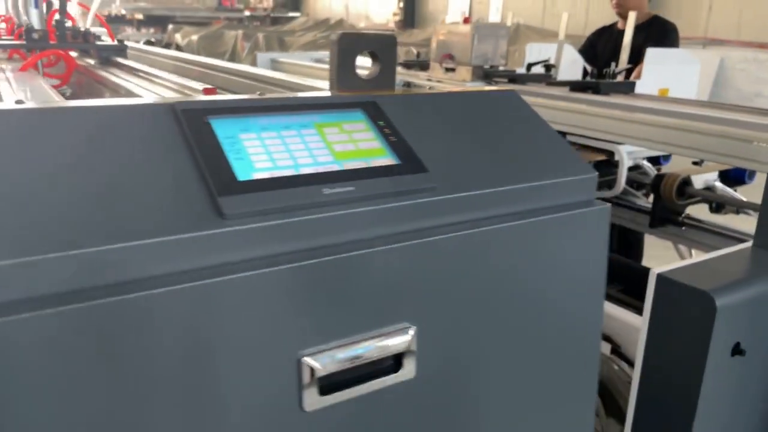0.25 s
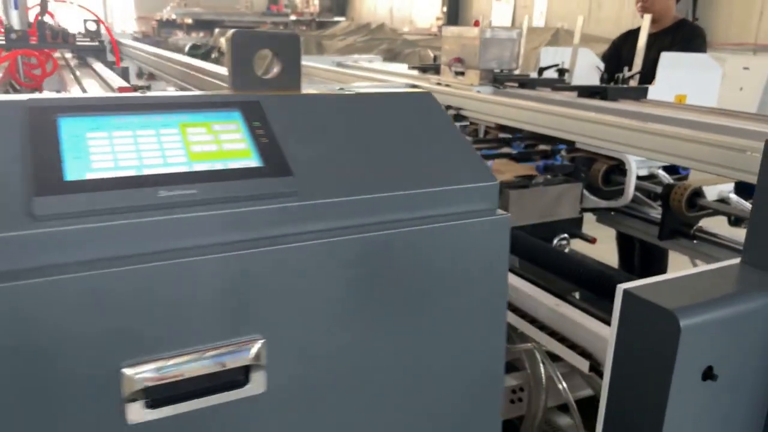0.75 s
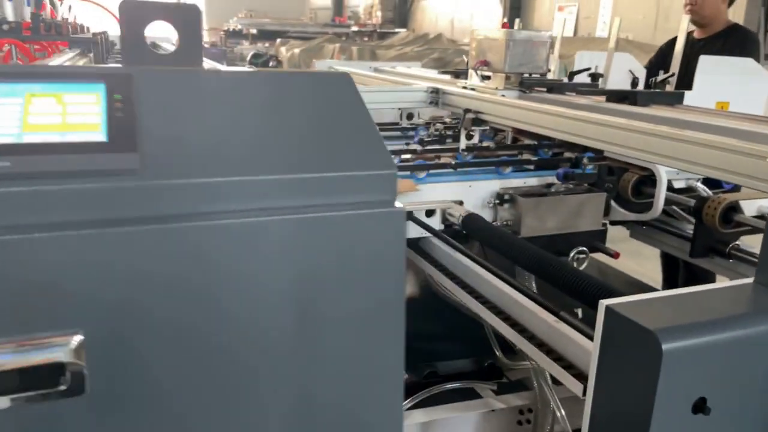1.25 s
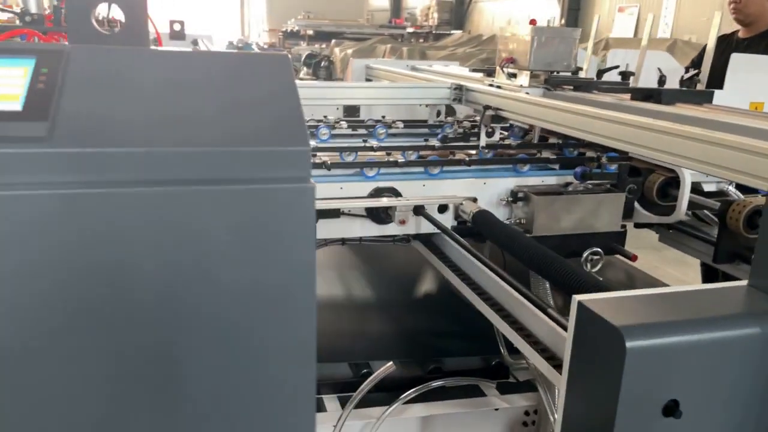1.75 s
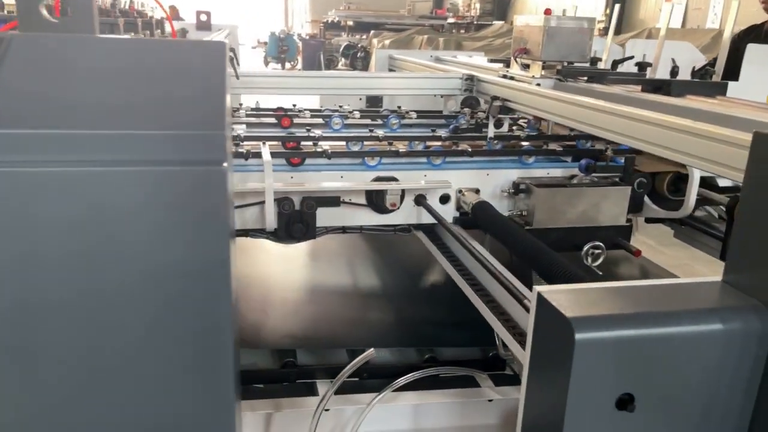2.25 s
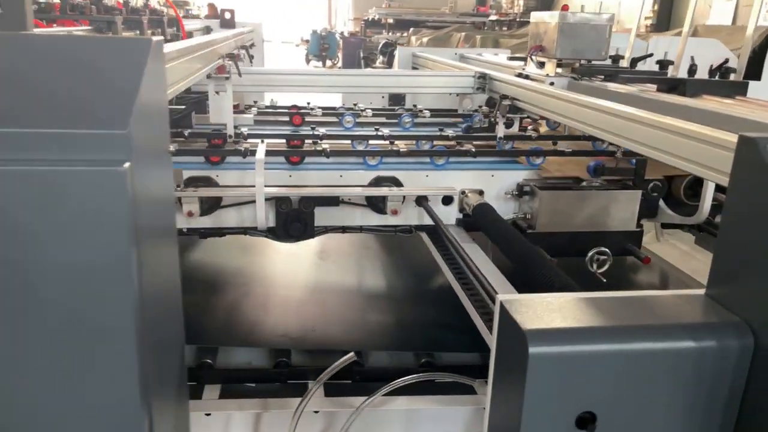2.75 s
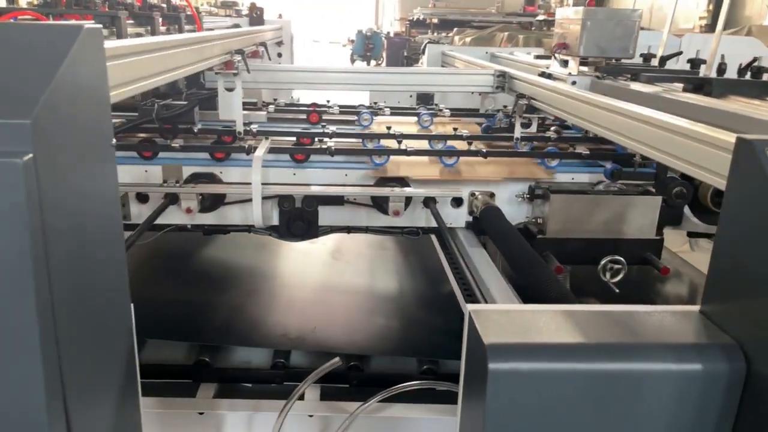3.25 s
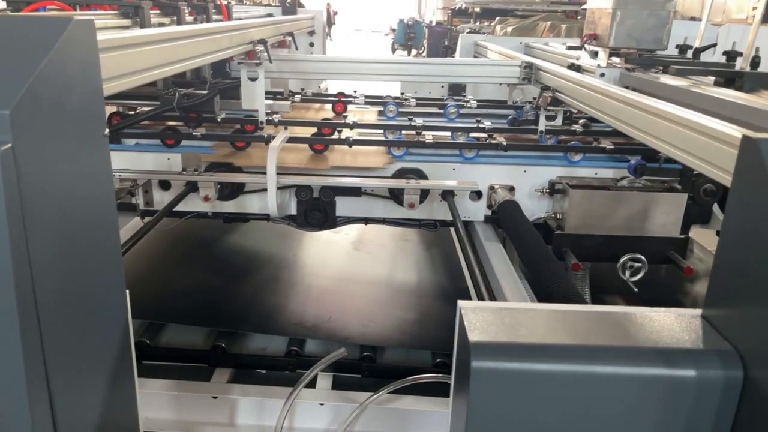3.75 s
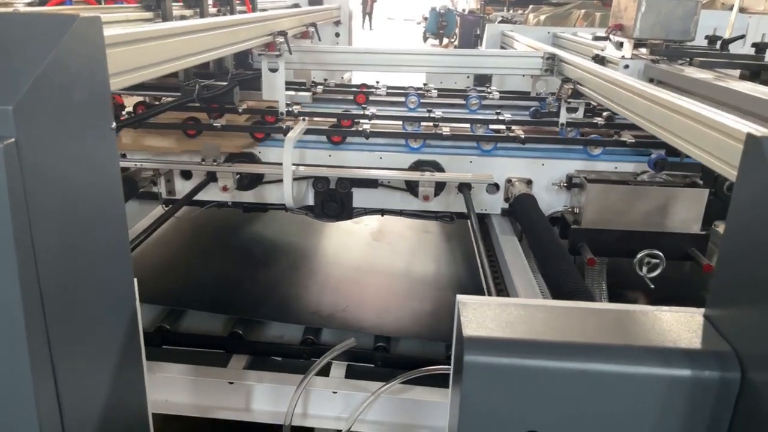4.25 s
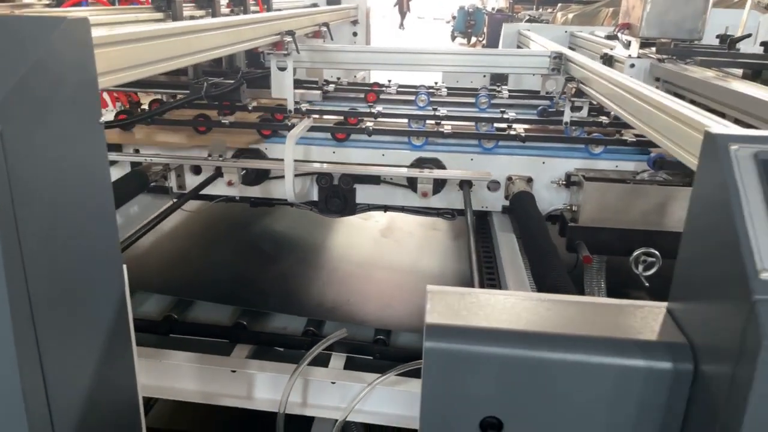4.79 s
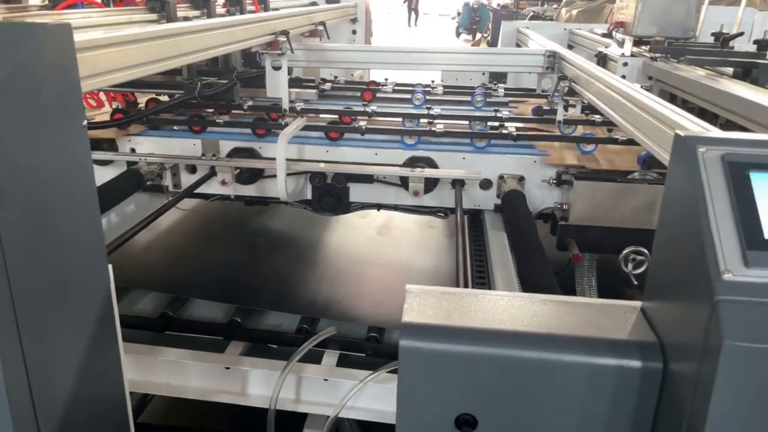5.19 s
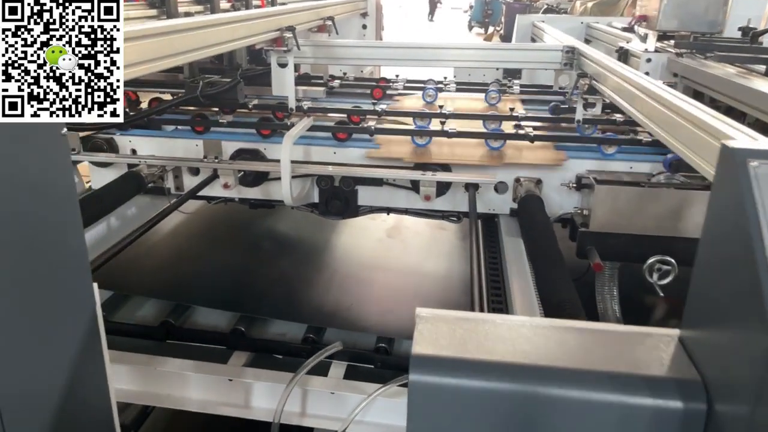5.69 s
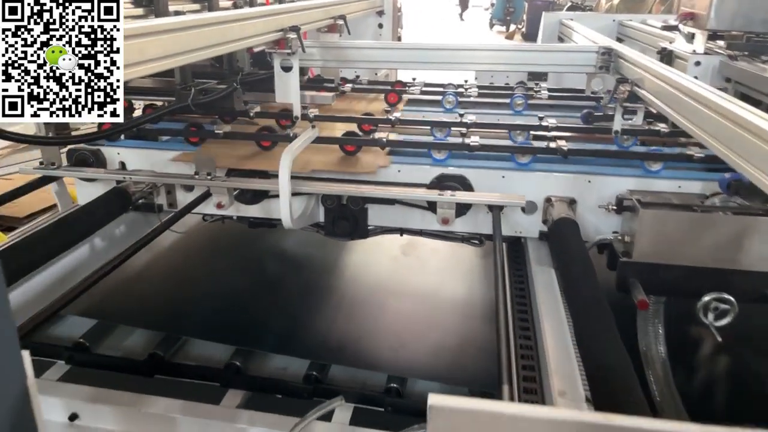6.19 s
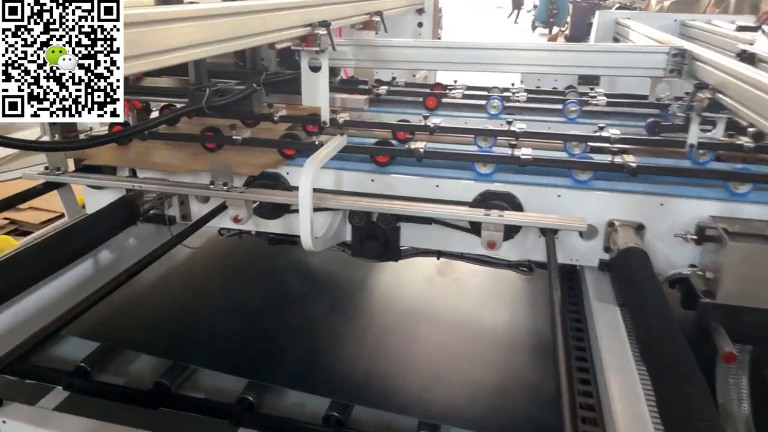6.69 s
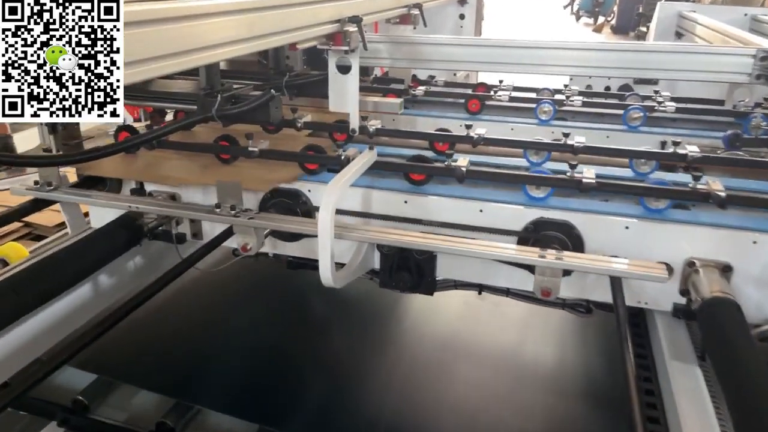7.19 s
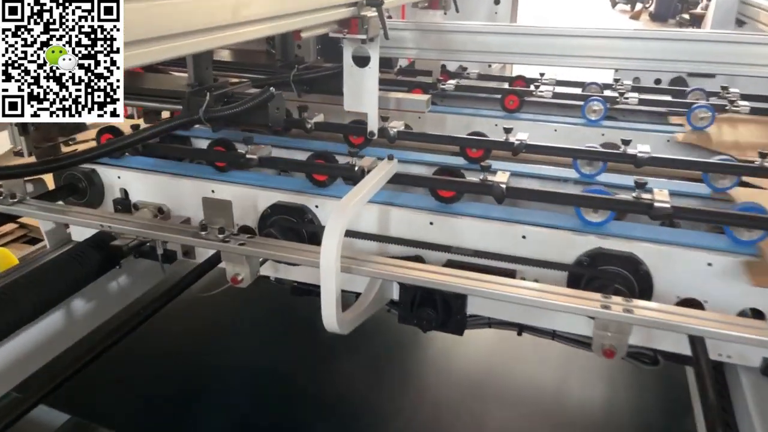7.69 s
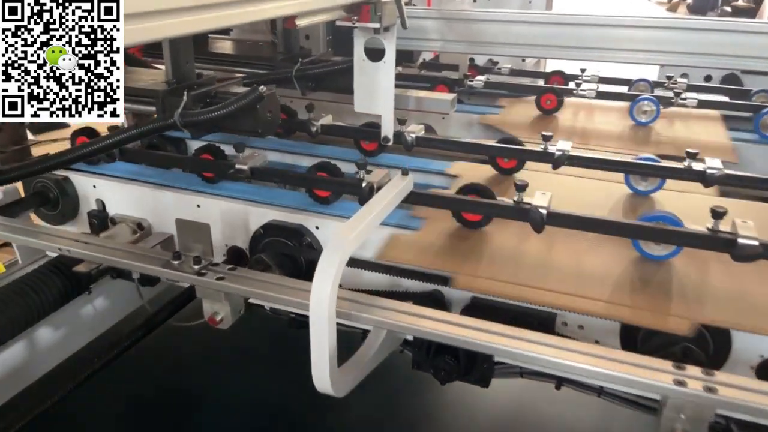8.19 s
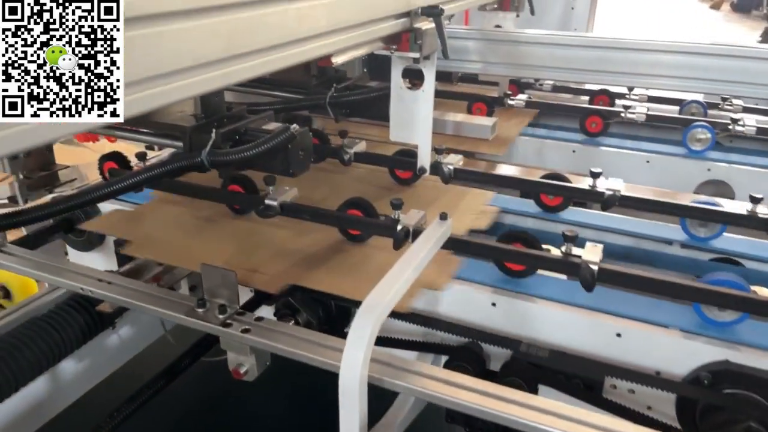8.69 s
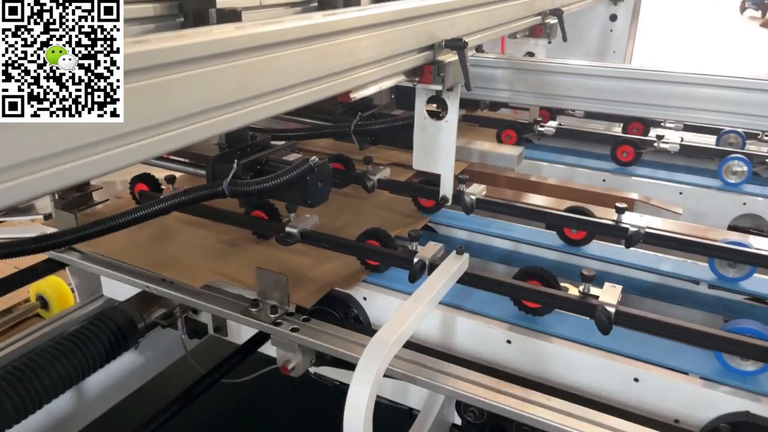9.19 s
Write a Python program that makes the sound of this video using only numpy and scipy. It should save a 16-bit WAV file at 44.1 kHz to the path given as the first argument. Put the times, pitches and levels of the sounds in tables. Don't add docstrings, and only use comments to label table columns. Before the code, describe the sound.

Low steady motor hum and roaring belts in a factory, cut by deep cardboard thumps, sharp knocks, dry scrapes and puffs of compressed air.

```python
import sys
import numpy as np
from scipy import signal
from scipy.fft import rfft, irfft, next_fast_len
from scipy.io import wavfile
from scipy.ndimage import uniform_filter1d

SR = 44100
rng = np.random.default_rng(int(sys.argv[2]) if len(sys.argv) > 2 else 0)


def boost(x):
    u = np.asarray(x, float) / 20
    return 10 ** u


def store_pcm(level_fs):
    pcm = np.round(np.clip(level_fs, -1, 1) * 32767).astype(np.int16)
    wavfile.write(sys.argv[1], SR, np.atleast_2d(pcm).T)


N = 416296
SIZE = next_fast_len(N)
TIME = np.arange(N) / SR
OCTAVE = np.log2(np.maximum(np.arange(SIZE // 2 + 1) * SR / SIZE, 1))


def unit(x):
    return x / np.sqrt(np.mean(x ** 2))


def noise():
    return rng.standard_normal(N)


def sine(hz, t):
    return np.sin(2 * np.pi * hz * t)


def columns(table):
    s, *rest = np.transpose(table)
    return [np.interp(TIME, s, column) for column in rest]


def gain_curve(points):
    hz, db = np.transpose(points)
    return boost(np.interp(OCTAVE, np.log2(hz), db))


def colour(x, points):
    return irfft(rfft(x, SIZE) * gain_curve(points), SIZE)[:N]


def ring(x, hz, width_hz):
    return signal.lfilter(*signal.iirpeak(hz, hz / max(width_hz, 1), fs=SR), x)


def walk(rate):
    hold = int(SR / rate)
    steps = np.repeat(rng.standard_normal(N // hold + 1), hold)
    return unit(uniform_filter1d(uniform_filter1d(steps, hold), hold)[:N])


def split(x, hz):
    low = signal.butter(4, hz, fs=SR, output="sos")
    high = signal.butter(4, hz, "high", fs=SR, output="sos")
    return signal.sosfilt(low, x), signal.sosfilt(high, x)


def decay(t, t60, rise):
    return (1 - np.exp(-t / max(rise, 1e-4))) * np.exp(-np.log(1000) * t / max(t60, .005))


def strikes(rows, shape):
    out, t = np.zeros(N + SR // 2), np.arange(SR // 2) / SR
    for s, *row in rows:
        start = int(s * SR)
        out[start:start + len(t)] += shape(t, *row)
    return out[:N]


def strokes(rows, attack_s, sag_db_per_s, release_t60_s):
    body, tinted = np.zeros(N), np.zeros(N)
    for s, length, db, tint_db in rows:
        t = TIME - s
        rise = np.clip(t / max(attack_s, .002), 0, 1)
        sag_db = sag_db_per_s * np.clip(t, 0, length)
        release_db = 60 * np.maximum(t - length, 0) / release_t60_s
        shape = rise * boost(db - sag_db - release_db)
        body += shape
        tinted += boost(tint_db) * shape
    return body, tinted


def motor():
    # (time [s], hum [Hz], level [dB])
    drive = [(0.0, 175, -21), (0.1, 171.3, -26), (0.23, 170, -20), (0.26, 169.7, -27.5), (0.73, 172.1, -27),
             (2.08, 170.4, -25), (2.34, 170.3, -22), (3.65, 170.9, -28), (4.7, 171.3, -22.5),
             (5.6, 170.3, -28.5), (7.02, 170.4, -23.5), (8.49, 171.4, -25.5), (8.6, 171, -38),
             (8.68, 172, -24), (8.75, 170, -45), (8.81, 170.9, -21), (8.94, 170.7, -30), (9.44, 171.5, -23)]
    # (multiple of the shaft turn, level [dB])
    shaft = [(2, -45.5), (4, -53.5), (5, -66), (7, -40), (8, -40), (9, -42.5), (10, -44), (12, -44.5),
             (16, -41)]
    # (frequency [Hz], width [Hz], level [dB])
    frame = [(86, 10, -31.5), (180.7, 27, -34.5), (335.4, 5.8, -38.5), (365, 13, -39), (508, 23, -38.5),
             (1115.5, 19, -48), (2360, 20, -48), (2550, 330, -42.5), (2984, 26, -51), (3305, 110, -47.5)]
    hum_order = 6
    hum_hz, hum_db = columns(drive)
    turn = 2 * np.pi * np.cumsum(hum_hz / hum_order) / SR
    out = np.sqrt(2) * boost(hum_db + 1.2 * walk(9)) * np.sin(hum_order * turn)
    for order, db in shaft:
        out += np.sqrt(2) * boost(db + 2.2 * walk(2.5)) * np.sin(order * turn + .8 * walk(3))
    for hz, width_hz, db in frame:
        out += boost(db) * unit(ring(noise(), hz, width_hz))
    return out


def push(t, hz):
    push_s = .0042
    swell = (t / push_s * np.exp(1 - t / push_s)) ** 3
    ratios = np.array([[1], [.74], [1.45], [2.6]])
    modes = np.cos(2 * np.pi * hz * ratios * (t - push_s))
    return swell * (np.array([0.67, 0.31, 0.24, 0.11]) @ modes)


def thump(t, db, hz):
    bounce_s, bounce_db = .0072, -9
    bounce = boost(bounce_db) * push(np.maximum(t - bounce_s, 0), hz)
    body = 0.28 * decay(t, 0.18, 0.009) * (sine(235, t) + sine(325, t))
    return boost(db - 6.5) * (push(t, hz) + bounce + body)


def hook():
    # (time [s], peak [dB], board mode [Hz])
    blows_on_board = [
        (2.06, -14, 800),
        (2.271, -6, 396),
        (4.361, -13, 826),
        (4.592, -5.5, 414),
        (6.403, -15, 322),
        (6.699, -9, 345),
        (6.917, -2.5, 420),
        (8.826, -11, 345),
        (9.029, -11, 875),
        (9.243, 0.5, 400),
    ]
    return strikes(blows_on_board, thump)


def knock(t, db, hz):
    knock_t60_s, tick_t60_s = .075, .012
    ratios = np.array([[.66], [1], [1.14], [1.31], [1.55], [2.2]])
    modes = np.sin(2 * np.pi * hz * ratios * t + 2 * np.pi * rng.random((6, 1)))
    cluster = decay(t, knock_t60_s, 0.002) * (np.array([0.3, 0.55, .3, 0.4, .3, 0.2]) @ modes)
    crack_fall = decay(t, knock_t60_s, .0012) + .8 * decay(t, tick_t60_s, .0003)
    crack = ring(rng.standard_normal(len(t)), 1800, 2400) * crack_fall
    return boost(db + 3.5) * (cluster + crack)


def stops():
    # (time [s], peak [dB], main mode [Hz])
    slaps = [(0.098, -29, 935), (0.17, -25, 1090), (2.427, -25, 1960), (2.512, -24.5, 1700),
             (3.529, -22, 939), (2.272, -22, 1200), (4.59, -22.5, 1250), (9.245, -20, 1200),
             (5.826, -22.5, 900), (4.62, -23, 1090), (6.965, -19, 1100), (6.755, -22, 1650),
             (4.748, -22.5, 971), (4.829, -26, 1250), (5.814, -21, 1400), (7.074, -18, 1950),
             (7.155, -19.5, 1350), (8.098, -20, 1892), (8.824, -21.5, 902), (9.158, -19, 1902),
             (9.285, -22, 1500), (9.06, -18, 1500), (9.398, -12, 980)]
    return strikes(slaps, knock)


def scrapes():
    # (time [s], drag length [s], level [dB], brightness [dB])
    drags = [(-0.03, .2, -28, -15), (1.265, 0.054, -29, -5), (2.03, 0.15, -28.5, -1),
             (2.265, 0.14, -28, -2), (3.5, 0.094, -33.5, -4), (4.335, .2, -29.5, 1), (4.59, .13, -28.5, 0),
             (5.74, .05, -33, 0), (6.665, .17, -26, 2.5), (6.925, 0.081, -23.5, -3),
             (8.075, 0.085, -27, -3), (8.9, .05, -32, 2), (8.985, .15, -22.5, -0.5),
             (9.25, 0.082, -24.5, 2)]
    # (frequency [Hz], level [dB per Hz])
    board = [(200, -19), (400, -7), (800, -3), (1080, -1.5), (1220, -6.5), (1530, -1.5), (2300, -6.5),
             (3300, -5), (5600, -13.5), (9000, -36)]
    grain_size = np.repeat(rng.exponential(size=N // 64 + 1), 64)[:N]
    grains = noise() * boost(2.0 * grain_size)
    for hz in np.geomspace(420, 5200, num=22):
        slips = boost(3.5 * walk(55)) * noise()
        grains += .8 * ring(unit(slips), hz, hz / 14) * np.sqrt(SR / 2 / hz)
    rubbing = unit(colour(grains, board)) * boost(1.6 * walk(60) + 3.5)
    dull, bright = split(rubbing, 1900)
    drag, tinted = strokes(drags, .03, 62, 0.16)
    late = np.interp(TIME - 0.0075, TIME, tinted)
    return drag * dull + late * bright


def air(near_db):
    # (frequency [Hz], level [dB per Hz])
    jet = [(1500, -39), (3000, 6.5), (5000, 0), (7500, 2.5), (11000, -2.5), (16000, -1)]
    # (time [s], peak [dB], top end [dB])
    valves = [(0.398, -33, -18), (0.9303, -42, -29), (1.221, -29, -17), (2.1779, -33, -12),
              (2.2912, -33, -20), (2.7142, -34, -17), (3.479, -28, -16), (3.914, -38, -18),
              (4.2665, -37, -11), (4.4994, -37, 0), (4.6094, -35, -15), (4.8075, -37, -18),
              (5.7608, -28.5, -7), (6.1345, -38, -22), (6.594, -35, -16), (6.779, -25, -21),
              (6.8249, -26, -3), (6.9372, -29, -15), (7.0694, -44, -5), (7.3582, -27, -6),
              (7.9094, -38, -16), (8.0451, -20, -18), (8.4294, -34, -17), (8.9161, -30, -13),
              (9.1502, -28, 10), (9.2493, -27, -10)]
    # (time [s], open length [s], level [dB], top end [dB])
    nozzles = [(0.0, 0.13, -44, -6), (1.22, 0.084, -40, -8), (1.75, 0.37, -44, -11), (2.15, .35, -41.5, -9),
               (3.19, 0.36, -33.5, -13), (4.2, .15, -47, -4), (4.35, 0.45, -36, -10), (5.75, .08, -43, -12),
               (5.92, .25, -40, -11), (6.6, 0.15, -42, -9), (6.82, 0.051, -39, -4), (6.92, 0.23, -37.5, -4),
               (7.34, 0.064, -53, -4), (8.04, 0.05, -32.5, -6), (8.15, .25, -40.5, -6),
               (8.4, 0.39, -41.5, -5), (8.8, .18, -39, 2), (8.99, 0.095, -29, -11),
               (9.13, 0.088, -32.5, -7), (9.24, .25, -29.5, -4)]

    def puff(t, db, top_db):
        return boost(db) * decay(t, 0.15, .0025)

    def puff_edge(t, db, top_db):
        return puff(t, db + top_db, 0)

    mid, top = split(unit(colour(noise(), jet)), 11500)
    blow, blow_top = strokes(nozzles, 0.03, 10, 0.35)
    leak = boost(-47 + 0.55 * near_db + 1.3 * walk(2.46))
    body = (leak + blow) * boost(0.49 * walk(27)) + strikes(valves, puff)
    edge = boost(-5) * leak + blow_top + strikes(valves, puff_edge)
    return boost(-1.0) * body * mid + boost(3.0) * edge * top


def link(t, db):
    pair = sine(1808, t) + 0.58 * np.sin(2 * np.pi * 1865 * t + 2 * np.pi * rng.random())
    return boost(db - 1.0) * decay(t, 0.066, 0.0027) * pair


def rattles():
    # (time [s], chain rattle [dB], bearing squeak [dB])
    nearness = [(0.0, -42, -48), (0.35, -37.5, -49), (0.76, -43, -47), (1.8, -44, -48), (2.0, -37, -46),
                (2.5, -43, -43), (3.05, -40, -44), (3.4, -45, -42), (4.9, -46, -43), (5.3, -39.5, -42),
                (6.4, -41, -45), (7.2, -40, -40), (7.6, -34.5, -44), (8.3, -33, -42), (8.85, -34.5, -44),
                (9.05, -34, -42), (9.44, -36, -37)]
    # (time [s], peak [dB])
    near_links = [(7.5173, -30), (7.5509, -25), (7.6016, -19), (7.649, -22), (7.6914, -35), (7.7523, -33),
                  (7.7827, -24), (7.877, -19), (7.9119, -30), (7.9753, -32), (8.0546, -33), (8.0983, -25),
                  (8.1364, -26), (8.1746, -22), (8.2576, -14.5), (8.297, -19), (8.3514, -14.5),
                  (8.4257, -23), (8.4935, -26), (8.6106, -32), (8.6632, -27), (8.704, -25), (8.7939, -31),
                  (8.827, -34), (8.8831, -23), (8.927, -31)]
    chain_db, squeak_db = columns(nearness)
    beat = 2 * np.pi * np.cumsum(22.5 * (1 + 0.014 * walk(3.26))) / SR
    links = (1.3 + np.maximum(np.sin(beat), 0) ** 2) * noise()
    chain = unit(ring(links, 1809, 30)) + 1.3 * unit(ring(ring(links, 1830, 130), 1830, 130))
    guard = boost(0.85 * chain_db - 9.5) * unit(ring(links, 1600, 450))
    flutter = boost(1.2 * walk(40)) * noise()
    squeak = ring(ring(flutter, 4115, 150), 4115, 150)
    out = boost(chain_db - 4.5) * unit(chain) + guard + strikes(near_links, link)
    return out + boost(squeak_db - 0.6) * unit(squeak)


def inverter():
    # (time [s], carrier [dB], lower sideband [dB])
    whistle = [(0.0, -55, -55), (0.63, -52, -57), (1.71, -54, -57), (2.23, -47.5, -54), (3.05, -51, -54),
               (3.52, -47, -50), (3.73, -53, -51), (4.92, -49, -50), (5.23, -45.5, -50), (6.62, -51, -51),
               (6.7, -49, -49), (7.89, -50, -50), (8.04, -45, -48), (8.31, -51, -50), (8.54, -38, -41),
               (8.73, -48, -54), (9.02, -46, -48), (9.44, -49, -54)]
    carrier_hz, wide_hz, narrow_hz = 5000.5, 376.5, 317
    carrier_db, lower_db = columns(whistle)

    def fading():
        return 3 * walk(3)

    # (offset from the carrier [Hz], level [dB])
    lines = [(0, carrier_db + 1.5),
             (-wide_hz, lower_db + 2.0), (wide_hz, -57 + fading()),
             (-narrow_hz, -53 + fading()), (narrow_hz, -59 + fading())]
    lines += [(carrier_hz + hz, -67 + fading()) for hz in (-69, 0, 33)]
    out = np.zeros(N)
    for hz, db in lines:
        level = np.sqrt(2) * boost(db - 3 * np.abs(walk(5)) + 2)
        out += level * np.sin(2 * np.pi * (carrier_hz + hz) * TIME + .8 * walk(8))
    return out


def squeaks():
    # (time [s], peak [dB], frequency [Hz])
    pings = [
        (0.15, -36, 4420),
        (5.733, -26, 4430),
        (6.595, -27, 4450),
    ]
    # (time [s], length [s], level [dB], frequency [Hz])
    squeals = [
        (3.65, .6, -45.5, 2990),
        (4.158, .3, -39, 1397),
    ]

    def ping(t, db, hz):
        return boost(db) * decay(t, .09, .003) * sine(hz, t)

    out = strikes(pings, ping)
    for s, length, db, hz in squeals:
        held = strokes([(s, length, db, 0)], 0.027, 5.0, .1)[0]
        out += held * boost(2.47 * walk(30)) * np.sin(2 * np.pi * hz * TIME + 1.5 * walk(25))
    return out


def belts(near_db):
    # (frequency [Hz], level [dB per Hz])
    roar = [(20, -92), (33, -82), (48, -87), (65, -47), (130, -50), (260, -57), (520, -56.5), (850, -63),
            (1250, -69.5), (1700, -70), (2200, -70.5), (5300, -75.5), (6000, -80), (10000, -84),
            (16000, -94)]
    spectrum = rfft(rng.standard_normal(SIZE)) * np.sqrt(SR / 2) * gain_curve(roar)
    out, shared_db = np.zeros(N), .5 * walk(7)
    for centre in np.arange(4.5, 14.5, .5):
        window = np.cos(np.pi * np.clip(OCTAVE - centre, -.5, .5)) ** 2
        share = np.clip((centre - 6.0) / 4.5, 0, 1)
        swell = boost(share * (near_db + shared_db) + 0.67 * walk(11))
        out += swell * irfft(spectrum * window, SIZE)[:N]
    return out


def hall(short):
    t = TIME[:SR]
    tail = split(rng.standard_normal(SR) * decay(t, 1, 0.0067), 4900)[0]
    tail /= np.sqrt(np.sum(tail ** 2))
    return boost(-11.5) * signal.fftconvolve(short, tail)[:N]


def scene():
    # (time [s], level [dB])
    near = [(0, 1.5), (.5, -.7), (2.2, 1), (4.6, 1.5), (5.6, -0.5), (7.05, 4), (7.8, 3.5), (8.8, 2),
            (9.44, 1.5)]
    near_db, = columns(near)
    short = hook() + stops() + scrapes() + air(near_db) + squeaks()
    steady = motor() + rattles() + inverter() + belts(near_db)
    return (steady + short + hall(short))[None]


def starve(x):
    # (from [Hz], to [Hz], share of patches dropped)
    thinned = [(10100, 10330, .2), (10330, 11020, .72), (11020, 11660, .56)]
    hz, s, cells = signal.stft(x, SR, "cosine", 2048)
    patch_db = 10 * np.log10(uniform_filter1d(np.abs(cells) ** 2, size=9, axis=0) + 1e-18)
    for low_hz, high_hz, share in thinned:
        band = (hz >= low_hz) & (hz < high_hz)
        usual_db = uniform_filter1d(patch_db[band].mean(axis=0), size=31)
        jump_db = 2.6 * np.repeat(rng.standard_normal(len(s)), 2)[:len(s)]
        margin_db = uniform_filter1d(patch_db[band], size=2, axis=1) - .7 * usual_db + jump_db
        cells[band] *= margin_db > np.quantile(margin_db, share)
    cells[hz > 15740] = 0
    return signal.istft(cells, SR, "cosine", 2048)[1][:N]


def low_pass(x):
    return signal.sosfilt(signal.butter(12, 16340, fs=SR, output="sos"), x)


def record(dry):
    # (frequency [Hz], level [dB])
    microphone = [(26, -4), (48, 0), (9900, -1), (10600, -7.5), (11600, -10), (13000, -3), (15000, 2),
                  (22000, -18)]
    heard = starve(colour(dry[0], microphone))
    return low_pass(heard[None])


dry = scene()
out = record(dry)
store_pcm(out)
```